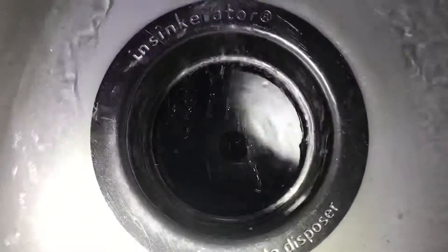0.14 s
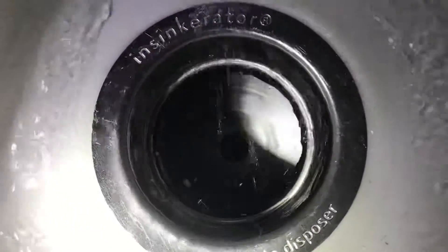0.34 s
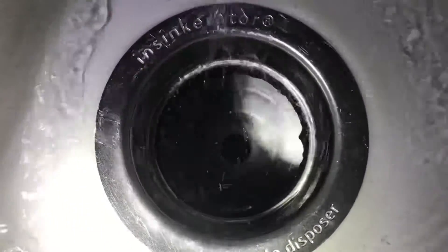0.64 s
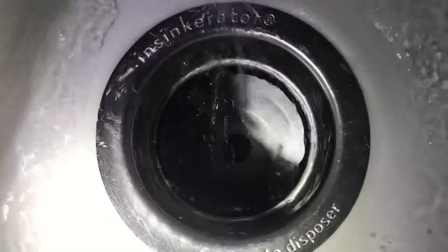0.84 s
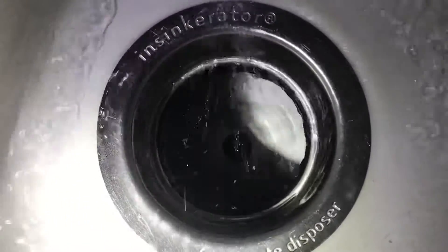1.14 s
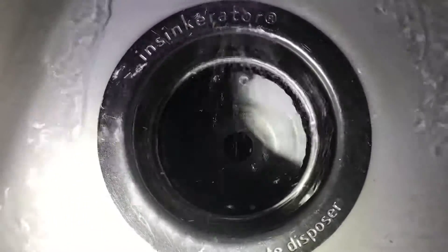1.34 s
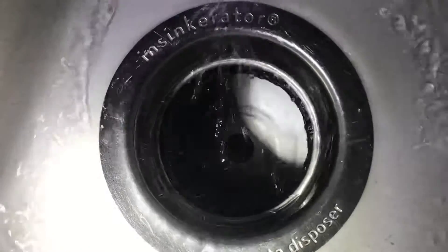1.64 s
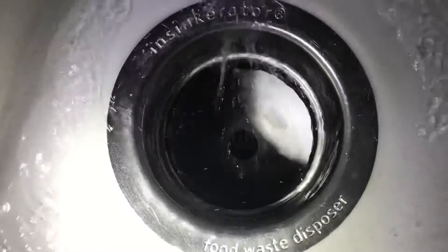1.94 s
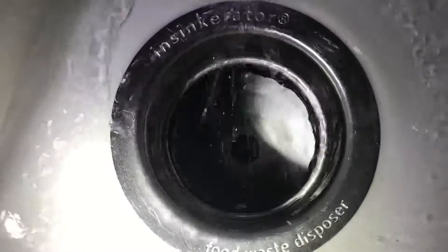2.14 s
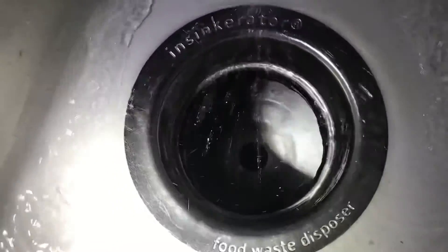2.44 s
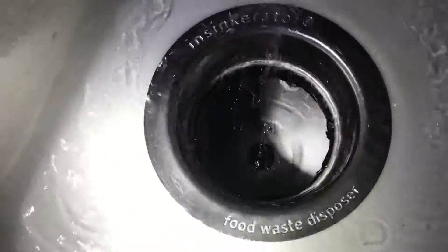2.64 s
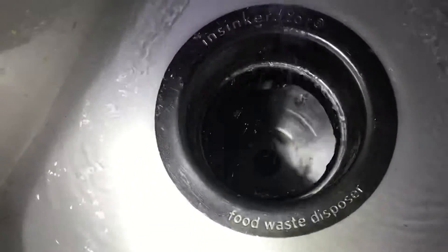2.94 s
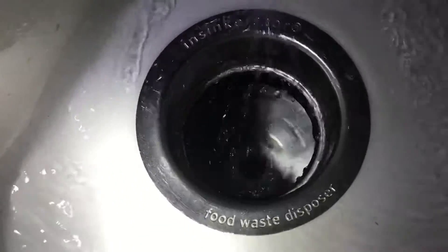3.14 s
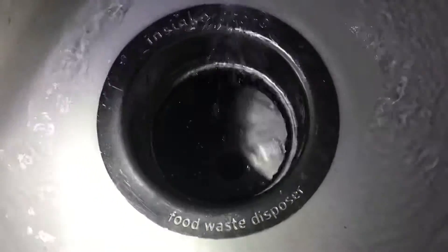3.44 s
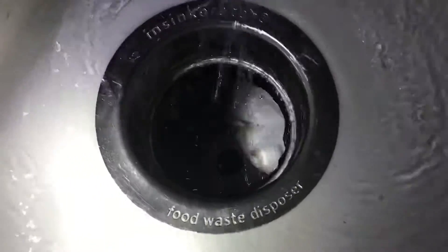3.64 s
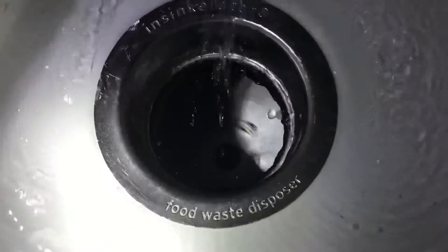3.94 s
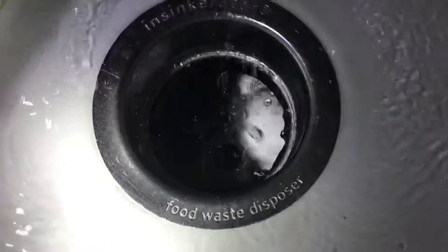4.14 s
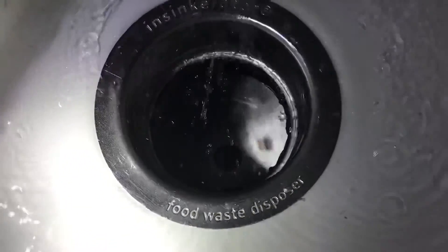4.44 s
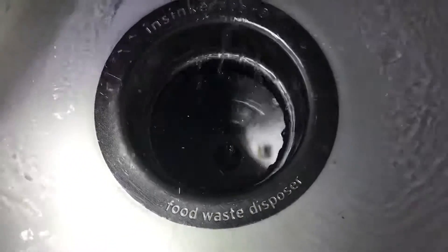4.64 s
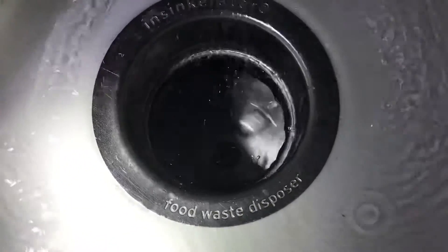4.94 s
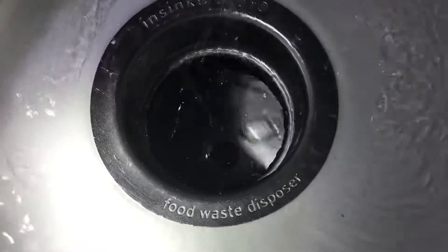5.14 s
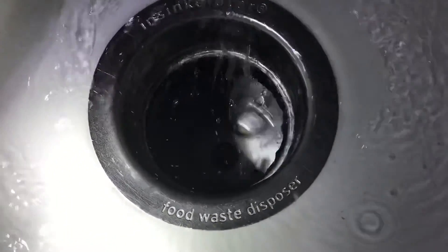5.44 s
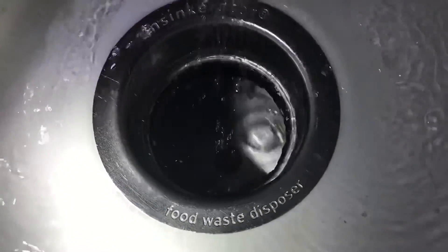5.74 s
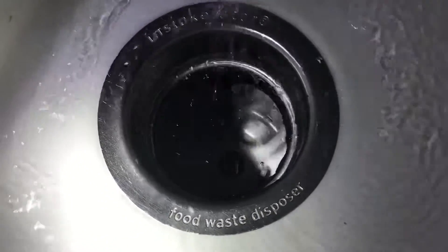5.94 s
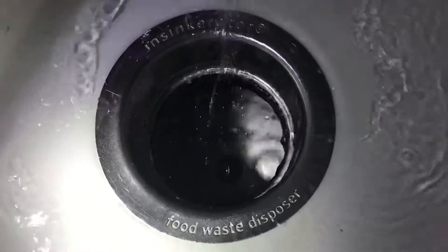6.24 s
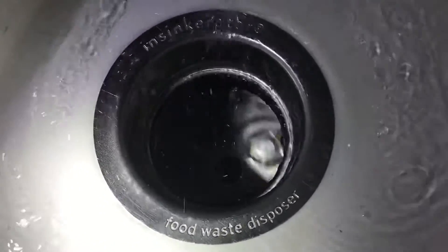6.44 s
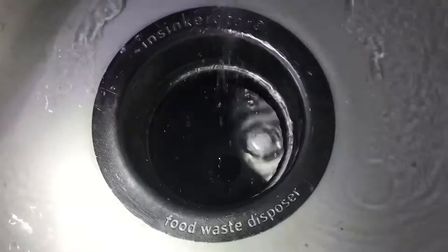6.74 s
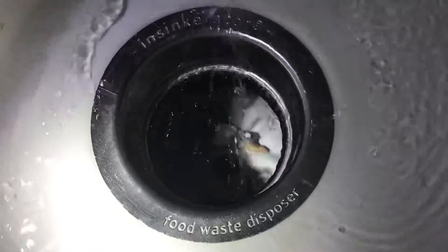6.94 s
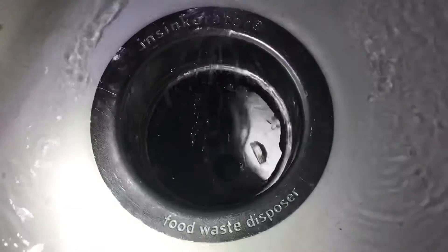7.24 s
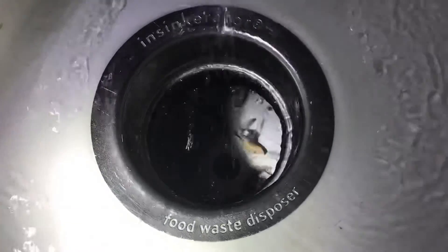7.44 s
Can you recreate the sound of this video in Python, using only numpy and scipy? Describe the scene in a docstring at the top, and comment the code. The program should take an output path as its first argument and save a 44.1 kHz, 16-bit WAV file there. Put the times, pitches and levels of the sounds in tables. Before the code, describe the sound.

A dense, rough rush of water fills a resonant drain, with sharp drop slaps, low glugs and a soft motor hum beneath. The tone turns slightly brighter and less boxy near three seconds as the listening point shifts. The motor cuts out just past five seconds, then the water drops away to sparse, bright ticking and plinking over sinking gurgles. Heard close and centred, with almost no room sound.

```python
"""Tap water sprays into the ringing drain of a kitchen waste disposer, heard from just above the steel sink.
The spray is noise gated by random impacts, with tiny bubbles, filtered by the resonances of the drain.
Noise and bubble tones filtered by the chamber make the churning; decaying tones and noise bursts add
glugs, air pockets and drops. The motor hums on harmonics of one tone and cuts off after five seconds;
the spray then collapses into a thin, ticking trickle. Low thumps and a faint rumble lie beneath."""
import sys
import numpy as np
from scipy import signal
from scipy.fft import rfft, irfft
from scipy.io import wavfile
from scipy.ndimage import uniform_filter1d, map_coordinates

SR = 44100
rng = np.random.default_rng(int(sys.argv[2]) if len(sys.argv) > 2 else 0)


def bounce(signal):
    """Save signal as a 16-bit WAV file at the path given by the first command-line argument."""
    frames = np.transpose(np.atleast_2d(signal))
    limited = np.clip(frames, -1, 1)
    pcm = np.round(limited * 32767).astype(np.int16)
    wavfile.write(sys.argv[1], SR, pcm)


N = 335204
TIME = np.arange(N) / SR

# Force of the water striking the drain: t/s, level/dB
FLOW = [(0, -28.5), (1.3, -29.5), (2.7, -29), (3.6, -30), (4.1, -32), (4.7, -30), (5.8, -33), (6.05, -36.5),
        (6.6, -40.5), (7.1, -45), (7.6, -49.5)]
# Breakup of the stream into drops: t/s, rate per band/(1/s), share of smooth hiss/1
BREAKUP = [(0, 760, 0.4), (3, 920, 0.3), (5.6, 470, 0.36), (6.3, 200, 0.4), (6.8, 280, 0.14), (7.6, 215, 0)]
# Water colours. Slopes: f/Hz, level/dB. Drain resonances: f/Hz, width/Hz, lift/dB
# Looking straight into the drain
OVER_SLOPE = [(200, -26), (550, -19.5), (880, -20), (1300, -15.5), (1900, -27.5), (2700, -22),
              (3600, -19.5), (6500, -7.5), (8500, -9.5), (12000, -12), (15500, -8)]
OVER_RESONANCES = [(666.4, 173, 18.1), (994, 70, 9), (1552, 195, 12.7), (1816, 51, 11.4), (2178, 676, 18.3),
                   (2552, 120, 9.7), (2970, 320, 8.5), (3364, 570, 16.2), (3750, 370, 10.4),
                   (4196, 670, 14.4), (4610, 170, 10.8), (5004, 150, 8.2), (5510, 281, 3), (8850, 210, 2.6)]
# While the listening point swings aside
SWING_SLOPE = [(200, -32), (550, -18), (880, -24), (1300, -22.5), (1900, -20), (2700, -16.5), (3600, -11),
               (6500, -9.0), (8500, -11.5), (12000, -14), (15500, -11.5)]
SWING_RESONANCES = [(672, 120, 14.7), (990, 130, 14.4), (1519, 410, 7.7), (1700, 157, 6.5), (2060, 260, 12),
                    (2430, 420, 5.5), (3040, 330, 12), (3340, 290, 8.8), (4330, 1100, 6), (5020, 320, 9.5)]
# Looking in at a slant
SLANT_SLOPE = [(200, -30), (550, -9), (880, -20.5), (1300, -17), (1900, -13), (2700, -13), (3600, -11),
               (6500, -8), (8500, -10.5), (12000, -12), (15500, -10.5)]
SLANT_RESONANCES = [(680, 157, 10.7), (1002, 360, 9.7), (1558, 130, 5.7), (1794, 65, 5.9), (2170, 220, 5.1),
                    (2424, 380, 11.6), (2983, 440, 13.3), (3386, 480, 12.5), (4236, 1150, 9),
                    (5090, 380, 6.6), (5414, 360, 6.5), (6040, 538, 6.2), (6670, 320, 4), (9500, 230, 4.2)]
# The thin trickle once the tap is turned down
TRICKLE_SLOPE = [(200, -26), (550, -34.5), (880, -26.5), (1300, -23.5), (1900, -36), (2700, -13),
                 (3600, -16), (6500, -9.5), (8500, 0.5), (12000, -2.5), (15500, -12.5)]
TRICKLE_RESONANCES = [(700, 190, 20.6), (1013, 210, 9.9), (1174, 111, 10.8), (1506, 250, 13),
                      (1765, 520, 19), (2110, 410, 16.4), (2410, 240, 9.6), (2950, 140, 5.7),
                      (3220, 240, 11.4), (4140, 680, 5.4), (5020, 1140, 6.5), (6140, 610, 6.8),
                      (6770, 416, 5.3), (7494, 224, 1.1), (9600, 490, 7.8), (11030, 1471, 6.4)]
# Narrow dips and peaks of the drain, shared by all four colours: f/Hz, width/Hz, lift/dB
NARROW_FEATURES = [(1264, 69, -8.5), (1986, 44, 7.5), (1980, 69, -7), (2300, 58, -14), (2386, 70, 3),
                   (3250, 67, 1)]
# Passage from each colour to the next: start t/s, end t/s
COLOUR_CHANGES = [(2.35, 2.9), (2.95, 3.35), (6.031, 6.1)]
# Single loud drops and slaps: t/s, peak level before the final colouring/dB, centre f/Hz
DROPS = [(0.1166, -17, 4200), (0.304, -15, 3970), (1.005, -14.5, 3830), (2.014, -16, 3830),
         (2.102, -14, 13000), (2.623, -14, 4640), (2.962, -15.5, 12600), (3.261, -15.5, 4570),
         (3.7117, -15, 6860), (3.8528, -14.5, 3600), (3.992, -20, 3280), (4.581, -17, 3300),
         (6.044, -13.5, 13500), (6.0823, -16, 11400), (6.1899, -20, 9160), (6.427, -23, 9500),
         (6.662, -21, 9840), (6.714, -17.5, 9000), (6.906, -12, 12500), (7.1178, -30, 8500),
         (7.1552, -18, 8900), (7.2021, -22, 11000), (7.234, -19, 12500), (7.2764, -22, 10900),
         (7.287, -16, 9000), (7.3256, -19.5, 10500), (7.3784, -15, 10900), (7.4443, -24, 9700),
         (7.464, -27, 7500), (7.5653, -21.5, 8600)]
# Chamber spectra while the water is stirred and once it settles: f/Hz, level/dB
STIRRED_SPECTRUM = [(25, -69), (40, -40), (60, -21), (110, -14.5), (160, -9.5), (190, -6.5), (220, 3),
                    (260, -1.5), (295, 1.5), (325, -5.5), (350, -3.5), (400, -10.5), (470, -33), (600, -40),
                    (1000, -44)]
SETTLING_SPECTRUM = [(25, -55), (40, -48), (60, -31), (110, -15), (145, -5.5), (175, -10.5), (220, 3),
                     (255, -1), (290, 5), (340, -5.5), (390, -6.5), (450, -4.5), (510, -18), (580, -23),
                     (1000, -61)]
# Large bubbles in the chamber: t/s, level before the swell and decay/dB, starting f/Hz, t60/s
GLUGS = [(0.081, -23, 360, 0.16), (0.098, -11, 333, 0.087), (0.569, -20, 254, 0.091),
         (1.529, -16.5, 233, 0.092), (1.587, -20, 223, .1), (2.195, -16.5, 222, 0.097),
         (2.885, -21, 225, 0.15), (3.535, -23, 222, 0.24), (4.058, -15.5, 252, 0.076),
         (5.345, -26, 212, 0.19), (5.968, -26.5, 212, 0.25), (6.06, -28, 209.8, 0.47),
         (6.228, -26, 225, 0.13), (6.275, -30.5, 448, 0.17), (6.498, -30, 465, 0.093),
         (6.68, -21, 272, 0.075), (6.779, -17, 225, 0.083), (6.896, -8, 222, 0.032),
         (7.205, -31, 160, 0.11), (7.212, -26.5, 265, 0.083)]
# Air pockets: t/s, length/s, first f/Hz, last f/Hz, nominal width/Hz, starting level/dB
POCKETS = [(0.03, .16, 740, 560, 45, -41), (0.2, 0.14, 512, 492, 20, -44.5),
           (4.262, 0.27, 507, 469, 40, -50.5), (5.249, 0.6, 570, 542, 110, -49),
           (5.682, .29, 690, 616, 68, -48.5), (5.929, .33, 578, 540, 65, -48),
           (6.248, 1.5, 462, 398.4, 55.5, -49.5)]
# Soft low thumps: t/s, approximate peak level/dB
THUMPS = [(0.311, -49), (2.098, -40), (2.522, -42), (2.96, -43), (5.56, -52), (6.004, -44), (6.503, -49)]
# Room rumble: f/Hz, level/dB before scaling to ROOM_DB
ROOM_SPECTRUM = [(20, -20), (55, 0), (90, 0), (200, -12), (1000, -40)]

# The fizz follows the flow by a smaller amount and swells in the trickle
FULL_FLOW_DB, FULL_FLOW_FIZZ_DB, FIZZ_FOLLOWS, TRICKLE_FIZZ_DB = -28, -29, 0.68, 2.5
# Drops ring longer in the full spray than in the trickle
SLAP_T60_S, TICK_T60_S = 0.048, 0.027
# Bubbles on the trickle emerge, hold and fade
PLINK_DB, PLINK_START_S, PLINK_RISE_S, PLINK_FADE_S, PLINK_FADE_DB_PER_S = -47.3, 5.7, 0.35, 6.56, 22
# The churning sinks slowly as the plate coasts, and faster once the chamber drains
CHURN_DB, COAST_DB_PER_S, DRAINED_S, DRAINED_DB_PER_S = -36, 3, 6.97, 10.5
# Rms level swing of the sloshing, larger once settled
SLOSH_HZ, SLOSH_STIRRED_DB, SLOSH_SETTLED_DB = 7, 0.33, 3
POCKET_ATTACK_S, POCKET_RELEASE_S, POCKET_FADE_DB_PER_S = 0.04, 0.045, 9.5
# The hum is steady but for one dip; at switch-off it drops sharply and dies away
HUM_HZ, HUM_DB = 99.98, -34.7
OFF_S, OFF_DROP_DB, OFF_DROP_S, HUM_FALL_DB_PER_S = 5.16, -8, 0.04, 121
DIP_S, DIP_DB, DIP_FALL_S, DIP_RECOVER_S = 2.1, -11, 0.022, 0.14
ROOM_DB, EDGE_HZ = -70, 15850


def spray(swell_db=0.26):
    """Source and filter: patter and tiny bubbles excite the drain, whose colour shifts with view and flow."""
    drops_and_hiss = patter()
    fine_bubbles = bubbles(1783, 9077, per_s=500, cycles=19.4, spread_db=4.5, rise=0.0032)
    drive = basin(drops_and_hiss + gain_of(-11.5) * fine_bubbles)
    colours = [
        (OVER_SLOPE, OVER_RESONANCES),
        (SWING_SLOPE, SWING_RESONANCES),
        (SLANT_SLOPE, SLANT_RESONANCES),
        (TRICKLE_SLOPE, TRICKLE_RESONANCES),
    ]
    stages = [1] + [passed(*span) for span in COLOUR_CHANGES] + [0]
    splash_db = follow(FLOW)[0] + swell_db * wander(4)
    fizz_db = FULL_FLOW_FIZZ_DB + FIZZ_FOLLOWS * (splash_db - FULL_FLOW_DB)
    fizz_db = fizz_db + TRICKLE_FIZZ_DB * passed(*COLOUR_CHANGES[-1])
    low_pass = signal.firwin(63, 7000, fs=SR)
    out = np.zeros(N)
    for k, (slope, resonances) in enumerate(colours):
        water = colour(drive, slope, list(resonances) + NARROW_FEATURES)
        splash = signal.oaconvolve(water, low_pass, "same")
        fizz = water - splash
        # splash and fizz are each brought to rms 1, then given their own levels
        both = gain_of(splash_db) * evened(splash) + gain_of(fizz_db) * evened(fizz)
        out += (stages[k] - stages[k + 1]) * both
    return out


def patter(count=9, wide=0.42):
    """Modulated noise: slaps cover all bands, droplets each sound in one band, and hiss stays smooth."""
    per_s, smooth = follow(BREAKUP)
    gush = np.sqrt(0.5 + impacts(150, spread_db=-0.5, decay_s=0.0098))  # the stream arrives in lumps
    slaps = impacts(per_s * 0.72, spread_db=4.0, decay_s=0.0021)
    hz = np.fft.rfftfreq(N, 1 / SR)
    noise = rfft(rng.standard_normal(N))
    place = np.interp(np.sqrt(hz), np.sqrt([900, 15000]), [0, count - 1])
    out = np.zeros(N)
    for k in range(count):
        droplets = impacts(per_s, spread_db=3.5, decay_s=0.0019)
        power = smooth + (1 - smooth) * (wide * slaps + (1 - wide) * droplets)
        triangle = np.maximum(1 - abs(place - k), 0)  # neighbouring bands overlap
        out += irfft(noise * triangle, N) * np.sqrt(power)
    return evened(out * gush)


def impacts(per_s, spread_db, decay_s, largest=3.5, even_s=0.16):
    """Shot noise: power of random unequal impacts, each decaying exponentially; mean about 1."""
    size = gain_of(spread_db * np.minimum(rng.exponential(1, N), largest)) ** 2
    hits = size * (rng.random(N) < per_s / SR) / per_s
    power = signal.lfilter([1], [1, -np.exp(-1 / (decay_s * SR))], hits)
    # divide by the short-time mean, so lumps stay brief and the slow level stays even
    return power / (abs(uniform_filter1d(power, round(even_s * SR))) + 1e-9)


def bubbles(lo_hz, hi_hz, per_s, cycles, spread_db, rise, count=36):
    """Bubble resonance: each of many sizes rings as a decaying tone that rises a little."""
    out = np.zeros(N)
    t = np.arange(4096) / SR
    for hz in np.geomspace(lo_hz, hi_hz, count):
        age = t * hz * rng.uniform(0.97, 1.03) / cycles  # in decay times, each lasting `cycles` periods
        phase = 2 * np.pi * cycles * (age + rise * age ** 2 / (1 + age / 10))
        ping = np.sqrt(hz) * np.exp(-age) * np.sin(phase)
        size = gain_of(spread_db * np.minimum(rng.exponential(1, N), 4))
        births = size * (rng.random(N) < per_s / count / SR)
        out += signal.oaconvolve(births, ping)[:N]
    return evened(out)


def basin(x, wet_db=-13, t60=0.047):
    """Early reflection: steel walls ripple the spectrum and give each drop a short tail."""
    t = np.arange(SR // 8) / SR
    tail = rng.standard_normal(len(t)) * gain_of(-60 * t / t60) * (t > 0.003)
    tail = band(tail / np.linalg.norm(tail), 1400, 9200)
    return x + gain_of(wet_db) * signal.oaconvolve(x, tail)[:N]


def plinks():
    """Bubble resonance: separate small bubbles stand out once the spray has thinned."""
    emerged = passed(PLINK_START_S, PLINK_START_S + PLINK_RISE_S)
    level = emerged * gain_of(PLINK_DB - PLINK_FADE_DB_PER_S * since(PLINK_FADE_S))
    pings = bubbles(2550, 7340, per_s=170, cycles=13, spread_db=4.5, rise=0.0051)
    return level * basin(pings, wet_db=-8, t60=0.04)


def drops(breadth=1.25, skirt_db=-14):
    """Impulsive excitation: each loud drop is a sharp burst that dies away between the steel walls."""
    out = np.zeros(N)
    t = np.arange(SR // 10) / SR
    for s, db, hz in DROPS:
        t60 = SLAP_T60_S if s < COLOUR_CHANGES[-1][1] else TICK_T60_S
        envelope = gain_of(-60 * t / t60) + np.exp(-t / 0.00068)  # ringing plus a sharp onset
        noise = rng.standard_normal(len(t)) * envelope
        skirt = gain_of(skirt_db) * band(noise, 3400, 11600)
        burst = band(noise, hz / breadth, hz * breadth, order=3) + skirt
        add(out, s, gain_of(db) * burst / abs(burst).max())
    return colour(out, [(11000, 0.5), (15500, -7)])


def churn():
    """Cavity resonance: turbulence and big bubbles sound in the chamber and settle after the motor stops."""
    turbulence = rng.standard_normal(N) * np.sqrt(impacts(140, spread_db=0.0, decay_s=0.013))
    gurgle = bubbles(177.8, 429.4, per_s=130, cycles=4.9, spread_db=-0.5, rise=0.0069)
    settled = passed(5.8, 6.24)
    out = np.zeros(N)
    for share, spectrum in ((1 - settled, STIRRED_SPECTRUM), (settled, SETTLING_SPECTRUM)):
        rush = evened(colour(turbulence, spectrum))
        gurgling = gain_of(-1.0) * evened(colour(gurgle, spectrum))
        out += share * evened(rush + gurgling)
    level_db = CHURN_DB - COAST_DB_PER_S * since(OFF_S) - DRAINED_DB_PER_S * since(DRAINED_S)
    slosh_db = SLOSH_STIRRED_DB + (SLOSH_SETTLED_DB - SLOSH_STIRRED_DB) * settled
    return gain_of(level_db + slosh_db * wander(SLOSH_HZ)) * out


def glugs(swell_s=0.0056, rise=0.33):
    """Bubble resonance: single large bubbles swell, ring and rise a little in pitch."""
    out = np.zeros(N)
    t = np.arange(SR // 4) / SR
    for s, db, hz, t60 in GLUGS:
        level = gain_of(db - 60 * t / t60) * (1 - np.exp(-(t / swell_s) ** 2))
        add(out, s, level * np.sin(2 * np.pi * hz * t * (1 + rise * t)))
    return out


def air_pocket(start, length, first_hz, last_hz, width_hz, db):
    """Narrow-band noise: a resonance that sinks in pitch as the pocket of air grows."""
    end = start + length
    hz = first_hz * (last_hz / first_hz) ** passed(start, end)
    # the tone changes its size and phase at random, faster where the resonance is wide
    steps = 1.3 * width_hz * TIME
    knots = rng.standard_normal((2, 4096))
    real, imaginary = (map_coordinates(k, [steps], mode="wrap") for k in knots)
    carrier = np.exp(2j * np.pi * np.cumsum(hz) / SR)
    tone = evened(((real + 1j * imaginary) * carrier).real)
    envelope = passed(start, start + POCKET_ATTACK_S) * (1 - passed(end - POCKET_RELEASE_S, end))
    return gain_of(db - POCKET_FADE_DB_PER_S * since(start)) * envelope * tone


def motor(second_db=-15, third_db=-22):
    """Harmonic series: the stator hums at twice the mains frequency with faint overtones."""
    wave = np.zeros(N)
    for k, db in enumerate([0, second_db, third_db], 1):
        wave += gain_of(db) * np.sin(2 * np.pi * k * HUM_HZ * TIME)
    lowest = DIP_S + DIP_FALL_S
    dip = passed(DIP_S, lowest) - passed(lowest, lowest + DIP_RECOVER_S)
    off_db = OFF_DROP_DB * passed(OFF_S, OFF_S + OFF_DROP_S) - HUM_FALL_DB_PER_S * since(OFF_S)
    return gain_of(HUM_DB + DIP_DB * dip + off_db) * evened(wave)


def thumps(base_hz=58, swell_s=0.011):
    """Transient tone: soft low thumps whose pitch sags exponentially."""
    out = np.zeros(N)
    t = np.arange(SR // 4) / SR
    hz = base_hz * (0.81 + np.exp(-t / 0.034))  # from about 105 Hz down to 47 Hz
    sagging = np.sin(2 * np.pi * np.cumsum(hz) / SR)
    swell = 2 * (t / swell_s) ** 2 * np.exp(-t / swell_s)  # peaks near 1
    for s, db in THUMPS:
        add(out, s, gain_of(db) * swell * sagging)
    return out


def room():
    """Stationary noise: the faint low rumble of the kitchen lies under everything."""
    return gain_of(ROOM_DB) * evened(colour(rng.standard_normal(N), ROOM_SPECTRUM))


def colour(x, slope, resonances=(), size=4096):
    """Minimum phase: a causal filter of a slope with resonances on it, so each click rings afterwards."""
    hz = np.fft.rfftfreq(size, 1 / SR)
    db = read(slope, hz)
    for f, width, lift in resonances:
        db = db + lift / (1 + (2 * (hz - f) / width) ** 2) ** 2
    log_gain = np.log(gain_of(np.r_[db, db[-2:0:-1]]))
    # the Hilbert transform of the log gain gives the phase
    taps = np.fft.ifft(np.exp(np.conj(signal.hilbert(log_gain)))).real
    return signal.oaconvolve(x, taps)[:len(x)]


def band(x, lo_hz, hi_hz, order=2):
    """Band-pass filtering: a Butterworth response keeps the range between two frequencies."""
    edges = [lo_hz, min(hi_hz, SR / 2 - 100)]
    return signal.sosfilt(signal.butter(order, edges, "band", fs=SR, output="sos"), x)


def wander(rate_hz, count=24):
    """Superposition: slow sines at rates up to rate_hz make a random swell of rms 1."""
    t = np.linspace(0, N / SR, N // 128)
    rates = np.geomspace(rate_hz / 4, rate_hz, count)
    waves = sum(np.sin(2 * np.pi * (hz * t + rng.random())) for hz in rates)
    return np.interp(TIME, t, evened(waves))


def gain_of(db):
    """Logarithmic level: decibels to amplitude."""
    return 10 ** (np.asarray(db) / 20)


def evened(x):
    """Mean power: scales to rms 1."""
    return x / np.sqrt(np.mean(x ** 2) + 1e-20)


def read(points, hz):
    """Logarithmic frequency: interpolates a spectrum between its points."""
    f, value = np.transpose(points)
    return np.interp(np.log(hz + 1), np.log(f + 1), value)


def follow(rows):
    """Linear interpolation: turns each column after the time into a signal."""
    s, *columns = np.transpose(rows)
    return [np.interp(TIME, s, c) for c in columns]


def passed(start, end):
    """Linear ramp: rises from 0 to 1 between two times."""
    return np.clip((TIME - start) / max(end - start, 1e-3), 0, 1)


def since(start):
    """Elapsed time: seconds since a moment, zero before it."""
    return np.maximum(TIME - start, 0)


def add(mix, s, sound):
    """Superposition: mixes a sound in at s seconds."""
    part = mix[max(round(s * SR), 0):][:len(sound)]
    part += sound[:len(part)]


def scene():
    """Superposition: all sources sit in the one drain, so both channels are alike."""
    pockets = sum(air_pocket(*row) for row in POCKETS)
    water = spray() + plinks() + drops()
    chamber = churn() + glugs() + pockets
    mono = water + chamber + motor() + thumps() + room()
    return np.array([mono, mono])


def record(dry):
    """Band limitation: a steep low-pass filter removes the range above EDGE_HZ."""
    low_pass = signal.firwin(1023, EDGE_HZ, window=("kaiser", 9), fs=SR)
    return signal.oaconvolve(dry, low_pass[None], "same")


dry = scene()
out = record(dry)
bounce(out)
```